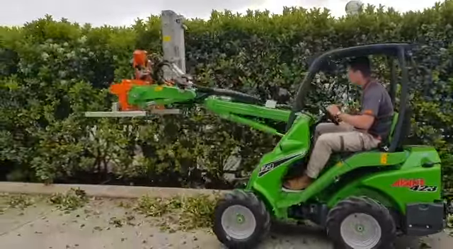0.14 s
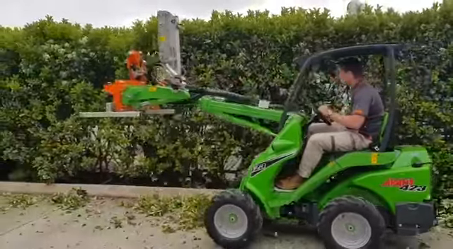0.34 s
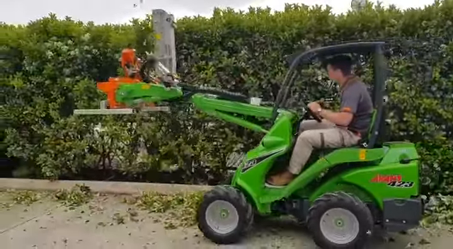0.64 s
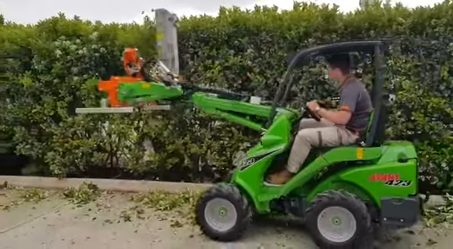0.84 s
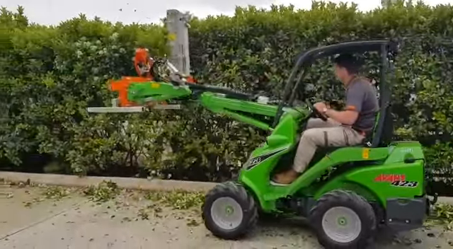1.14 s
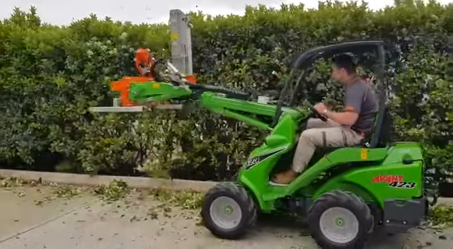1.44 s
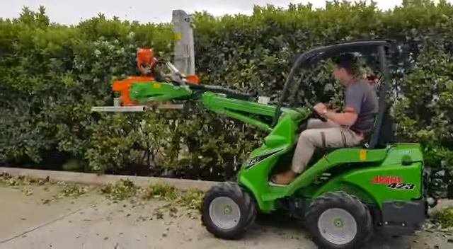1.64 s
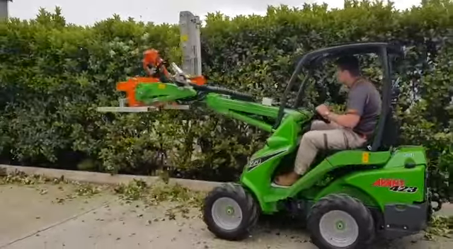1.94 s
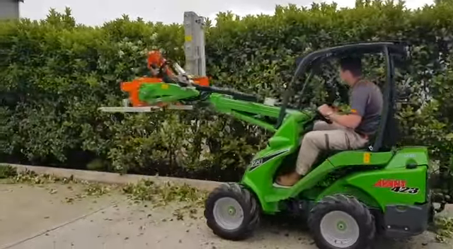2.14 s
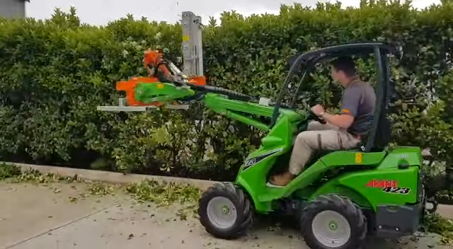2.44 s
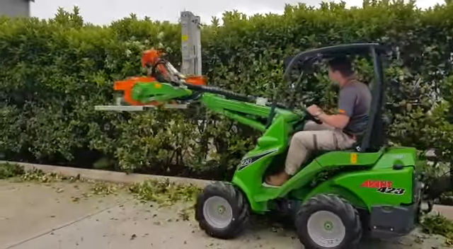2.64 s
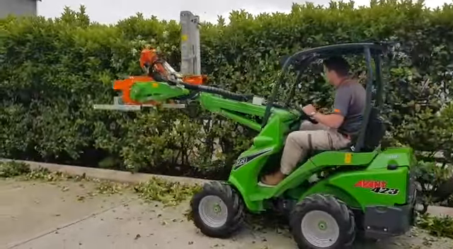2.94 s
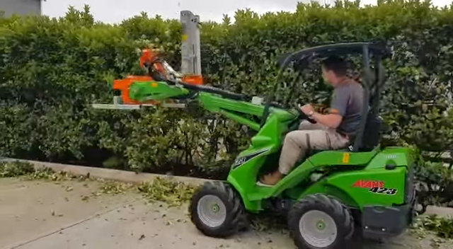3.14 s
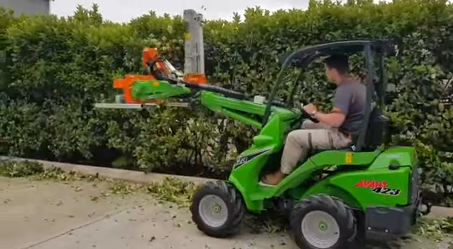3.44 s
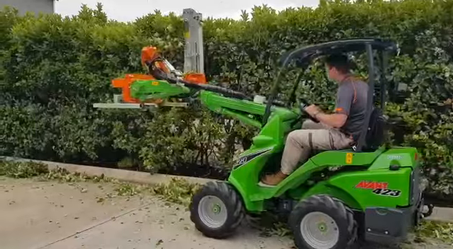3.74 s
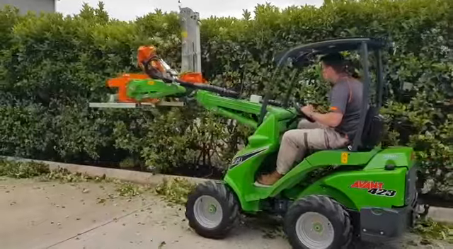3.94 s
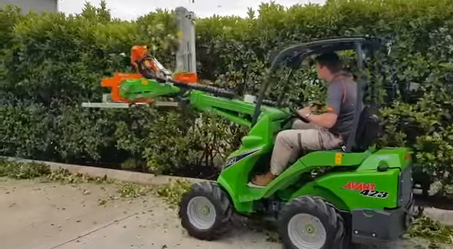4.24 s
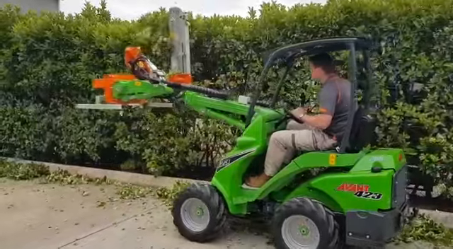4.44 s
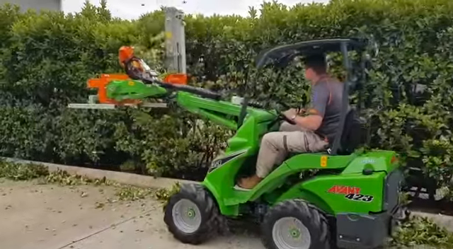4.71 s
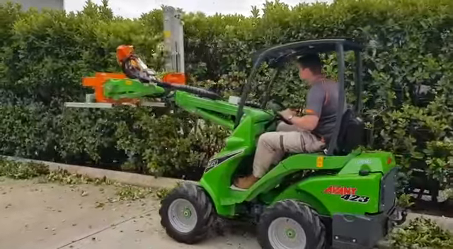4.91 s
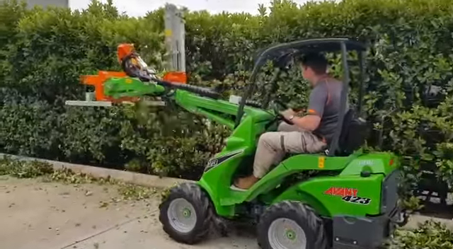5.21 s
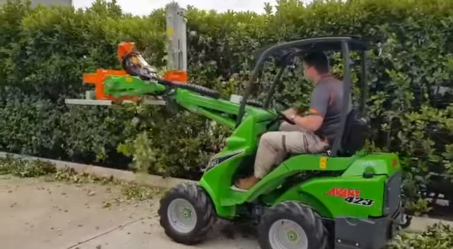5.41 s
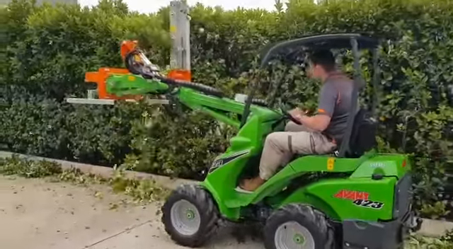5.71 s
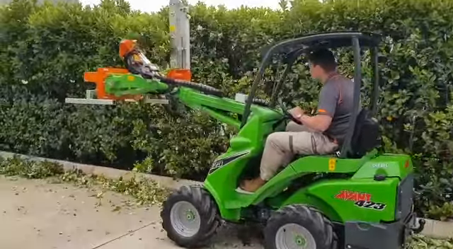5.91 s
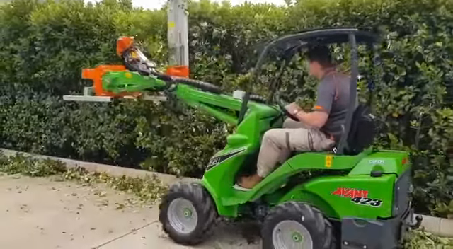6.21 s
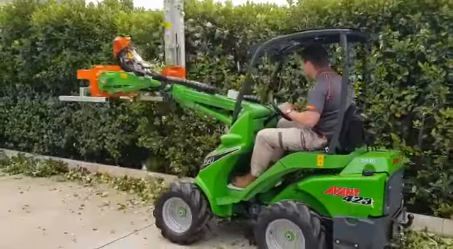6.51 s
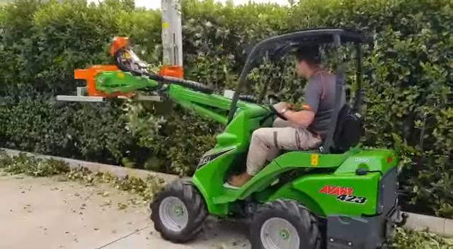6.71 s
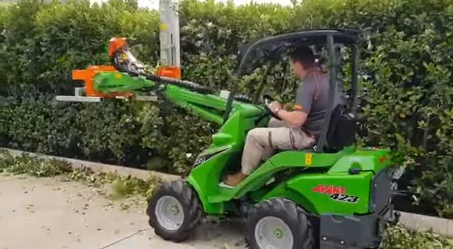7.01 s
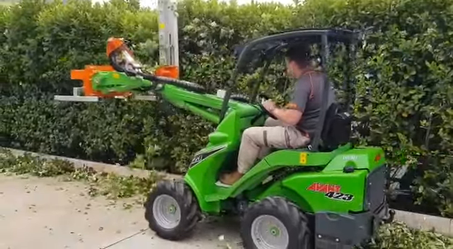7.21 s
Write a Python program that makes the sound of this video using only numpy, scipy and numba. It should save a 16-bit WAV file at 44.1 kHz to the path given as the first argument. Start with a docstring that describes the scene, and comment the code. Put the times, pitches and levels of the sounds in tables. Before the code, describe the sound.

A steady low engine drone with mid-pitched whine runs throughout, close and outdoors, a little left. Over it, spinning blades make a fluttering, bright leafy hiss in uneven tufts, with dry ticks and stalk cracks. Wind thumps the microphone briefly before a loud stretch of fast woody chopping and metallic ringing, when the engine seems to duck. Then lighter swishing returns, with an occasional squeak and crunch, as the exhaust tone fades and whine and clatter remain.

```python
"""By a roadside hedge a small wheel loader creeps along at fixed throttle, a cutter on its arm, a little left.
Its exhaust drones and its drive whines; from the start the blades hiss through leaves in uneven tufts and snap stalks.
A short gust then buffets the microphone, and from about 3.6 to 5.1 s thick growth is chopped once a turn, which rings
the cutter's housing; meanwhile the firing tone fades as the tail turns to us; after 5.1 s the growth thins.
Throughout, the recorder's gain control ducks the engine whenever the cutting gets loud."""
import sys
import numpy as np
from scipy import signal
from scipy.fft import rfft, irfft, next_fast_len
from scipy.io import wavfile
from scipy.ndimage import uniform_filter1d
from numba import njit

SR = 44100
rng = np.random.default_rng(int(sys.argv[2]) if len(sys.argv) > 2 else 0)


def output_pcm(signal):
    """Save a mono or channel-first signal as 16-bit PCM at the path in sys.argv[1].

    Samples are clipped to [-1, 1] before scaling.
    """
    pcm = np.clip(np.atleast_2d(signal).T, -1, 1) * 32767
    wavfile.write(sys.argv[1], SR, np.round(pcm).astype(np.int16))


N = 324558
T = np.arange(N) / SR  # time, s

# leaf spectrum, shared by the hiss and the snapping stalks: f/Hz, relative level/dB
LEAF_SPECTRUM = [(1500, -28), (3000, -10), (4400, -8.5), (5600, -5), (7100, -4), (7900, -8.5), (8700, -8.5),
                 (9600, -1), (10900, -0.5), (12600, 1), (14200, -4), (16000, -6)]


def undb(db):
    """Decibels to gain."""
    return 10 ** (np.asarray(db) / 20)


def unit(x):
    """Scale to rms 1."""
    return x / np.sqrt(np.mean(x ** 2))


def curves(table):
    """Each column after the time column as a control, sample by sample."""
    s, *columns = np.transpose(table)
    return [np.interp(T, s, c) for c in columns]


def shape(x, response):
    """Filter by a response given as a function of frequency."""
    size = next_fast_len(N + 8192, True)
    f = np.maximum(np.fft.rfftfreq(size, 1 / SR), 1)
    return irfft(rfft(x, size) * response(f), size)[..., :N]


def gains(points, f):
    """Gain of a (Hz, dB) spectrum at the frequencies f, interpolated over log frequency."""
    hz, db = np.transpose(points)
    return undb(np.interp(np.log(f), np.log(hz), db))


def air(like_hz=1150):
    """White noise at two microphone ports: alike in the bass, unrelated in the treble."""
    common, own = rng.standard_normal(N), rng.standard_normal((2, N))

    def apart(f):
        return 1 / (1 + (like_hz / f) ** 3)
    return shape(common, lambda f: np.sqrt(1 - apart(f))) + shape(own, lambda f: np.sqrt(apart(f)))


def colour(x, points):
    """Give a sound a spectrum, at rms 1."""
    return unit(shape(x, lambda f: gains(points, f)))


def walk(rate):
    """Random levels held 1 / rate s and smoothed twice; rms 1."""
    k = max(int(SR / rate), 1)
    steps = np.repeat(rng.standard_normal(N // k + 1), k)
    return unit(uniform_filter1d(uniform_filter1d(steps, k), k)[:N])


def strokes(turns, decay):
    """A puff that starts at each whole turn and dies away over a share of it; rms 1."""
    return unit(np.exp(-(turns % 1) / decay))


def crackle(spread_db, size):
    """Noise broken into tiny grains, size samples long, of very unequal strength."""
    grains = undb(spread_db * rng.exponential(size=N // size + 1).clip(0, 5))
    return air() * np.repeat(grains, size)[:N]


def blow(t, rise_s, hold_s, decay_s):
    """Shape of one blow that rises, holds and dies away."""
    return (1 - np.exp(-t / rise_s)) * np.exp(-np.maximum(t - hold_s, 0) / decay_s)


def burst(s, rise_s, hold_s, decay_s):
    """Envelope of one blow starting at s."""
    out, i = np.zeros(N + SR), max(int(s * SR), 0)
    t = T[:SR]
    out[i:i + len(t)] = blow(t, rise_s, hold_s, decay_s)
    return out[:N]


def bursts(times, dbs, rise_s, hold_s, decay_s):
    """Envelope of many short blows; their powers add."""
    t = T[:SR // 4]
    one = blow(t, rise_s, hold_s, decay_s)
    power = np.zeros(N + len(t))
    for s, db in zip(times, dbs):
        i = max(int(s * SR), 0)
        power[i:i + len(t)] += (undb(db) * one) ** 2
    return np.sqrt(power[:N])


def tone(turns, flutter_db, jitter):
    """One partial of a rotating part, unsteady in level and in phase (jitter in radians)."""
    angle = 2 * np.pi * (turns + rng.random()) + jitter * walk(14)
    return np.sqrt(2) * np.sin(angle) * undb(flutter_db * walk(8.2))


def wind():
    """Gusts swell and fade on the microphone as low noise, with single buffets within the main one."""
    # wind spectrum: f/Hz, relative level/dB
    wind_spectrum = [(15, -32), (40, -16), (80, -4), (140, -4.5), (220, -12.5), (330, -16), (600, -37),
                     (2000, -73)]
    # gusts: t/s, length/s, level/dB
    gust_table = [(1.925, .06, -40), (2.82, .54, -34.5)]
    # single buffets: t/s, level/dB
    buffet_table = [(2.875, -25), (3.015, -22.5), (3.105, -22), (3.22, -25), (3.312, -26)]
    gusts = sum(undb(db) * burst(s, rise_s=0.041, hold_s=length, decay_s=0.045) for s, length, db in gust_table)
    buffets = bursts(*np.transpose(buffet_table), rise_s=0.0039, hold_s=0.019, decay_s=0.022)
    return colour(air(), wind_spectrum) * (gusts * undb(2 * walk(24.45)) + buffets)


def exhaust_drone(turns, firing_db, bay_db):
    """Exhaust harmonics locked in phase to the shaft; the second is the firing tone."""
    # harmonics above the firing tone: multiple of the shaft speed, relative level/dB
    upper_harmonics = [(3, 0), (4, -4), (5, -11.5), (7, -13)]
    shaft_base_db, upper_base_db = -30, -33.5  # before the engine bay's change
    shaft_follows = 0.32  # share of the firing tone's change, in dB, that the shaft tone follows

    def harmonic(k, db):
        return -np.sqrt(2) * undb(db) * np.sin(2 * np.pi * round(k) * turns)
    shaft_db = shaft_base_db + bay_db + shaft_follows * (firing_db - firing_db[0])
    drone = harmonic(1, shaft_db) + harmonic(2, firing_db)
    return drone + sum(harmonic(k, upper_base_db + bay_db + db + 0.72 * walk(15)) for k, db in upper_harmonics)


def drive_whine(turns):
    """Partials of the hydraulic drive, which turns once in three shaft turns."""
    # drive tones: multiple of the drive speed, relative level/dB
    drive_tones = [(7, -15), (10, -8.5), (14, -9.5), (20, -9), (21, -13), (25, -17), (26, 2), (29, -8.5),
                   (33, -10.5), (77, -17), (111, -16)]
    gearing = 3  # shaft turns for one drive turn
    return sum(undb(db) * tone(round(k) * turns / gearing, flutter_db=1.0, jitter=0.17) for k, db in drive_tones)


def pump_whine(turns):
    """Partials of the hydraulic pump, which sits on the engine shaft."""
    # pump tones: multiple of the shaft speed, relative level/dB
    pump_tones = [(7, -26), (8, -16.5), (9, -5), (10, -12), (12, -8), (24, -14)]
    return sum(undb(db) * tone(round(k) * turns, flutter_db=0.5, jitter=0.11) for k, db in pump_tones)


def motor_hum():
    """One unsteady tone from a separate motor, independent of the engine speed."""
    return tone(169.8 * T, flutter_db=2.0, jitter=0.3)  # Hz times s gives cycles


def engine_clatter(turns):
    """Broad machine noise that beats once and twice a shaft turn; rms 1."""
    # machine noise spectrum: f/Hz, relative level/dB
    machine_spectrum = [(25, -12), (60, -4), (140, -0.5), (200, -3.5), (300, -6.5), (370, -8), (520, -1.5),
                        (720, -9.5), (900, -6), (1150, -9), (1450, -9.5), (2800, -16), (6000, -30.5),
                        (16000, -44)]
    beat = 1 + 0.22 * strokes(turns, decay=0.51) + 0.089 * strokes(2 * turns, decay=0.19)
    return colour(air() * beat * undb(0.63 * walk(40)), machine_spectrum)


def loader():
    """Exhaust, drive, pump, motor and clatter, rebalanced as the machine turns to the microphone."""
    # engine speed, sagging a little in the thick growth: t/s, shaft f/Hz
    speed = [(0, 52.6), (2.5, 52.7), (3.6, 52.7), (4.3, 52.3), (5.3, 52.65), (6.8, 52.7), (7.36, 53.1)]
    # the loader turns its side and then its tail:
    # t/s, firing tone level/dB, drive whine level/dB, pump tones level/dB, engine bay change/dB
    aspect = [(0, -19, -39, -43, -1), (1.2, -17, -37, -36.5, 0.5), (2.7, -17.5, -38, -34, .5),
              (3.4, -19, -43, -38, -0.5), (4.2, -20.5, -36, -38.5, 1), (5.3, -26.5, -41.5, -40, 0.5),
              (6.1, -30.5, -45, -38.5, -1.7), (6.7, -28, -44, -36, 2), (7.36, -29, -47, -31, 1.5)]
    hum_base_db, clatter_base_db = -35.5, -32  # before the engine bay's change
    firing_db, drive_db, pump_db, bay_db = curves(aspect)
    hz, = curves(speed)
    turns = np.cumsum(hz) / SR + 0.0032 * walk(12)
    sound = exhaust_drone(turns, firing_db, bay_db)
    sound = sound + undb(drive_db) * drive_whine(turns) + undb(pump_db) * pump_whine(turns)
    sound = sound + undb(hum_base_db + bay_db) * motor_hum()
    return sound + undb(clatter_base_db + bay_db) * engine_clatter(turns)


def housing(x):
    """The cutter's housing rings at its modes, dark between them; rms 1."""
    # housing modes: f/Hz, width/Hz, relative level/dB
    mode_table = [(368, 63, 5), (413.6, 58, 7), (476, 174, 2), (1372, 32, 1), (1463, 60, -0.5),
                  (1784, 59, -4.5), (2190, 210, -5.5), (3076, 210, -5.5), (3820, 220, -5),
                  (4980, 100, -1.5)]

    def modes(f):
        return sum(undb(db) / (1 + 1j * (f / hz - hz / f) * hz / width) ** 2 for hz, width, db in mode_table)
    return unit(shape(x, modes))


def leaf_load():
    """How much foliage meets the blades, in dB: uneven outer growth plus the dense tufts."""
    # light outer growth brushing the blades: t/s, leaf load level/dB
    growth = [(0, -26), (.45, -24), (1.08, -22), (1.45, -27), (1.85, -28.5), (2.15, -26.5), (2.6, -32.5),
              (2.9, -27.5), (3.55, -30), (3.9, -18.5), (4.95, -18.5), (5.25, -28.5), (5.55, -28),
              (5.82, -34), (6.21, -30), (6.32, -24.5), (6.6, -25), (7.36, -29)]
    # dense tufts that the blades plough through: t/s, length/s, leaf load level/dB
    tuft_table = [(0.37, 0.13, -24), (1.222, 0.072, -21.5), (1.52, 0.11, -27), (1.706, 0.03, -20.5),
                  (3.88, 0.3, -21), (4.273, 0.5, -18), (5.034, 0.081, -12.5), (5.615, 0.07, -24),
                  (6.002, 0.075, -19.5)]
    growth_db, = curves(growth)
    tufts = sum((undb(db) * burst(s, rise_s=0.012, hold_s=length, decay_s=0.044)) ** 2
                for s, length, db in tuft_table)  # power
    return 10 * np.log10(undb(growth_db + 0.72 * walk(14)) ** 2 + tufts)


def stalks(load_db):
    """Envelope of leaf stalks snapping at random through the hiss."""
    per_s, above_load_db, scatter_db = 22, 4, 7.5
    chance = rng.random((int(per_s * N / SR), 2))
    times = chance[:, 0] * T[-1]
    dbs = np.interp(times, T, load_db) + above_load_db + scatter_db * (2 * chance[:, 1] - 1)
    return bursts(times, dbs, rise_s=.0001, hold_s=.0004, decay_s=0.0016)


def foliage():
    """Two blades a turn sweep the leaves; each sweep tears an uneven handful, snaps stalks and stirs the housing."""
    # rustle spectrum: f/Hz, relative level/dB
    rustle_spectrum = [(600, -13), (1200, -11.5), (1450, -3), (1650, -2.5), (1850, 2), (2600, -2),
                       (3300, -3), (4200, -0.5), (6000, -3), (9000, -21), (16000, -30)]
    cutter_hz = 30.1
    # the rustle grows more slowly than the hiss: its level at a usual load, and dB per dB of load
    usual_rustle_db, usual_load_db, rustle_slope = -32, -24.5, 0.59
    load_db = leaf_load()
    rustle_db = usual_rustle_db + rustle_slope * (load_db - usual_load_db) + 1.4 * walk(18)
    turns = cutter_hz * T + 0.08 * walk(4)
    blade_passes = 0.39 * strokes(2 * turns, decay=0.67) * undb(2.5 * walk(45))
    sweep = unit(1 + blade_passes + 0.2 * strokes(turns, decay=0.23))
    hiss = colour(crackle(spread_db=1.0, size=14) * sweep * undb(0.57 * walk(45)), LEAF_SPECTRUM)
    rustle = colour(crackle(spread_db=1.76, size=40) * sweep ** .5, rustle_spectrum)
    stalk_snaps = colour(air(), LEAF_SPECTRUM) * stalks(load_db)
    stirred = undb(rustle_db - 9.5) * housing(air() * sweep)
    return undb(load_db + 3) * hiss + stalk_snaps + undb(rustle_db) * rustle + stirred


def chopping():
    """Envelope of the chops: a blade meets each stem once a turn, cracks it and tears on, never equally hard."""
    # woody stems, each chopped until it is through: t/s, chops, relative level/dB
    stems = [(.707, 1, -6), (1.013, 1, -10), (1.709, 2, -7.5), (1.922, 1, -14), (2.083, 1, -11),
             (3.607, 1, -8), (3.674, 1, -7), (3.725, 2, -4.5), (3.807, 6, -4.5), (4.023, 3, -1.5),
             (4.074, 4, -1), (4.275, 1, 1.5), (4.345, 5, -2), (4.514, 1, 1), (4.549, 2, -1),
             (4.616, 1, 1.5), (4.65, 3, -1.5), (4.75, 7, -4), (4.98, 1, -3.5), (5.011, 2, -0.5),
             (5.982, 1, -10), (6.015, 3, -7.5), (6.266, 1, -12), (6.349, 1, -10), (6.785, 1, -10),
             (7.019, 1, -13)]
    loaded_turn_s, scatter_db = .0337, 0.6  # one turn of the cutter, slowed by wood
    blows = [(s + k * loaded_turn_s, db) for s, count, db in stems for k in range(round(count))]
    times, dbs = np.transpose(blows)
    dbs = dbs + scatter_db * rng.standard_normal(len(blows))
    crack = bursts(times, dbs + .8, rise_s=0.00013, hold_s=0.0014, decay_s=0.0028)
    tear = bursts(times, dbs - .5, rise_s=0.00033, hold_s=0.013, decay_s=0.01)
    return np.hypot(crack, tear)


def twigs():
    """Each chop sprays splinters and knocks the housing; thick branches make it groan; lone ticks click."""
    # splintering wood spectrum: f/Hz, relative level/dB
    twig_spectrum = [(800, -9), (2000, -16), (3200, -7), (4600, -6), (5700, -3), (7100, 1.5), (7900, -6.5),
                     (8700, -5), (9600, 6.5), (10900, 4), (12600, 5.5), (14200, 4), (16000, -5)]
    # blades labouring through thicker branches: t/s, level/dB, length/s
    bite_table = [(3.797, -34, 0.24), (4.01, -26.5, 0.15), (4.31, -26.5, 0.15), (4.502, -33.5, 0.5),
                  (5.072, -27.5, 0.07), (6.034, -28.5, 0.028)]
    # lone dry ticks: t/s, level/dB
    tick_table = [(1.013, -10), (1.358, -13), (1.458, -14), (2.793, -13), (2.975, -12), (6.812, -17)]
    chops = chopping()
    spray = undb(-8.5) * colour(crackle(spread_db=2.0, size=12), twig_spectrum) * chops
    bites = sum(undb(db) * burst(s, rise_s=0.0043, hold_s=length, decay_s=0.042) for s, db, length in bite_table)
    ring = housing(air()) * (bites + undb(-33) * chops)
    tick_envelope = bursts(*np.transpose(tick_table), rise_s=.0001, hold_s=0.00026, decay_s=0.00096)
    return spray + ring + colour(air(), twig_spectrum) * tick_envelope


def squeaks():
    """Sappy green stems stick and slip on the steel: short tones with a ragged pitch."""
    # squeaks: t/s, f/Hz, level/dB, length/s, rasp/radians per unit of raggedness
    squeak_table = [(0.12, 4500, -28.5, 0.03, 2.5), (0.288, 4500, -27.5, 0.024, 1.8),
                    (1.688, 3070, -24.5, .006, 1.5), (1.766, 4300, -21.5, 0.0092, 2),
                    (2.1, 1990, -30, 0.0093, 1.1), (2.23, 4350, -27, 0.012, 1.3),
                    (2.27, 4250, -32, 0.0092, 1.8), (2.45, 1964, -43.5, 0.17, 0.33),
                    (4.03, 1490, -27, .1, 0.54), (4.11, 1390, -32, .08, .5), (4.328, 1498, -29.5, .1, .7),
                    (5.74, 4000, -42.5, 0.26, 0.59), (6.003, 4880, -31, 0.046, .6),
                    (6.081, 1815, -30, 0.021, .5)]
    ragged = walk(900) + walk(120)
    sound = np.zeros(N)
    for s, hz, db, length, rasp in squeak_table:
        squeal = np.sin(2 * np.pi * hz * T + rasp * ragged)
        sound += undb(db) * squeal * burst(s, rise_s=0.0011, hold_s=length, decay_s=0.0072)
    return sound


def patchy(x, flicker_db, rate):
    """Each leaf and twig has its own pitch, so half-octave bands flicker on their own."""
    centres = np.arange(10.5, 14.5, .5)  # octaves above 1 Hz
    bands = (shape(x, lambda f: np.interp(np.log2(f), centres, 1. * (centres == c))) for c in centres)
    return sum(band * undb(flicker_db * walk(rate)) for band in bands)


def reflected(x):
    """Short paths comb the sound; their lengths wander as the machine creeps on, differently at each port."""
    # early reflections off the steel arm, the pole and the pavement: delay/s, level/dB
    paths = [(.0011, -30), (.0027, -11.5), (.0052, -13.5)]

    def port(v):
        return v + sum(undb(db) * np.interp(T - delay * (1 + 0.0344 * walk(1.3)), T, v) for delay, db in paths)
    return np.array([port(v) for v in x])


@njit
def follow(x, rise, fall):
    """A level follower that rises and falls at different speeds."""
    out, e = np.empty(len(x)), x[:4096].mean()
    for i in range(len(x)):
        e += (x[i] - e) * (rise if x[i] > e else fall)
        out[i] = e
    return out


def gain_control(x):
    """The gain falls quickly when the treble passes a threshold and creeps back afterwards."""
    threshold_db, ratio, attack_s, release_s, treble_hz = -27, 1.68, 0.047, 0.38, 3040
    treble = shape(x, lambda f: f / np.hypot(f, treble_hz))
    level = np.sqrt(np.abs(uniform_filter1d(np.mean(treble ** 2, axis=0), size=256)))
    held = follow(level, 1 / (attack_s * SR), 1 / (release_s * SR))
    return x * np.maximum(held / undb(threshold_db), 1) ** (1 / ratio - 1)


def scene():
    """Everything in the open air, a little to the left: it reaches the left port first."""
    left_lead_s = .00005
    cutting = reflected(patchy(foliage() + twigs(), flicker_db=1.1, rate=50))
    sound = wind() + loader() + cutting + squeaks()
    return shape(sound, lambda f: np.array([np.ones_like(f), np.exp(-2j * np.pi * f * left_lead_s)]))


def record(dry):
    """The muffled right port loses treble; the recorder rides the gain, rounds the highest peaks and cuts the top."""
    # the two microphone ports: f/Hz, left minus right level/dB
    port_table = [(60, 3.5), (200, 3), (380, 6), (700, 0.1), (1290, 5.5), (2380, 4.5), (4400, 3.5),
                  (6000, 2), (7200, 14.5), (8300, 18), (9700, 20.5), (10800, 28), (12300, 20), (15000, 24)]
    ceiling, top_hz = .9, 15850  # ceiling: share of full scale

    def ports(f):
        ratio = gains(port_table, f)
        return np.array([ratio, np.ones_like(f)]) * np.sqrt(2 / (1 + ratio ** 2))  # total power kept
    ridden = undb(0.63) * gain_control(shape(dry, ports))
    rounded = ridden / (1 + (ridden / ceiling) ** 4) ** .25
    return signal.sosfilt(signal.ellip(12, .2, 80, top_hz, fs=SR, output="sos"), rounded)


dry = scene()
out = record(dry)
output_pcm(out)
```